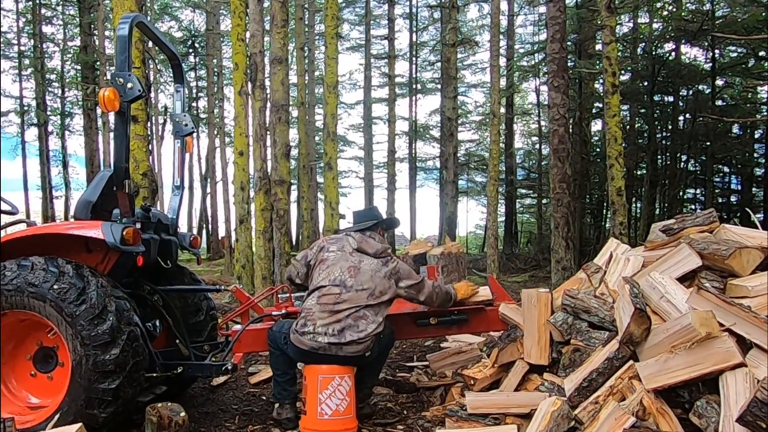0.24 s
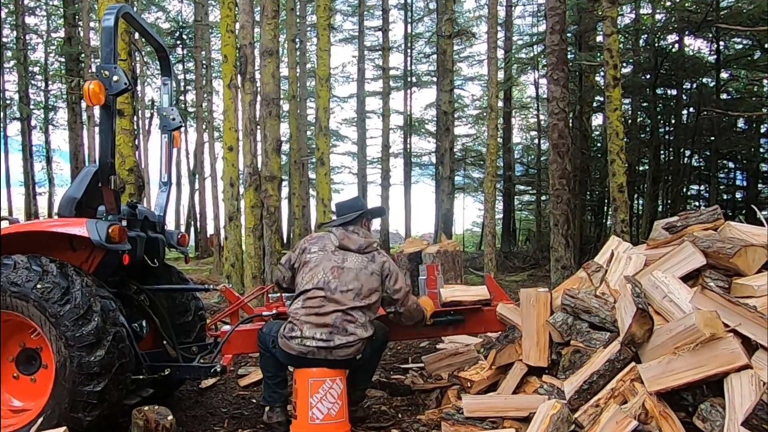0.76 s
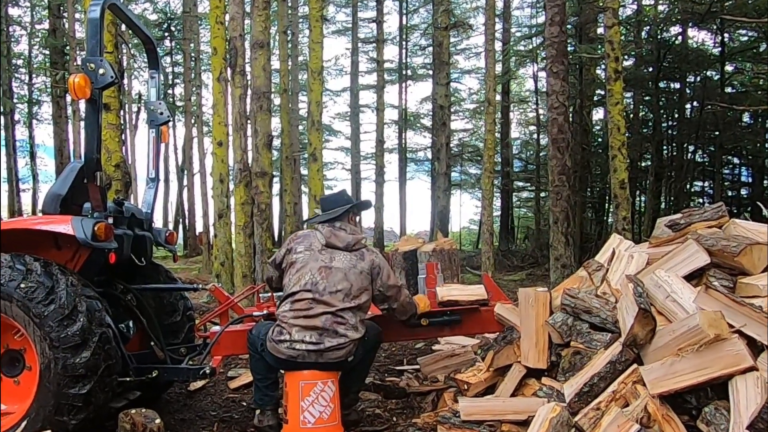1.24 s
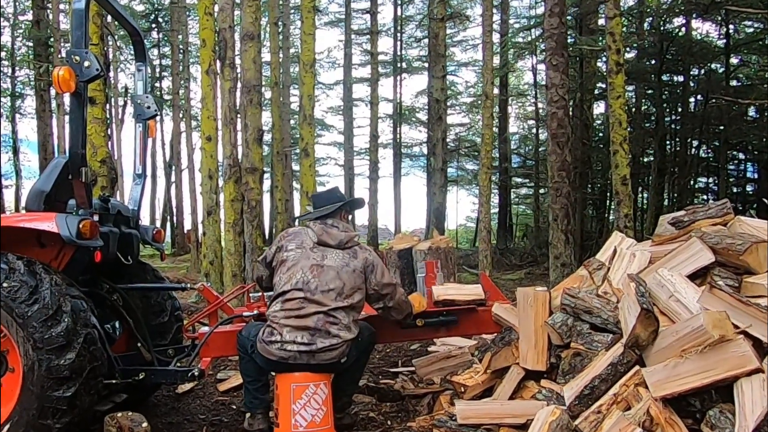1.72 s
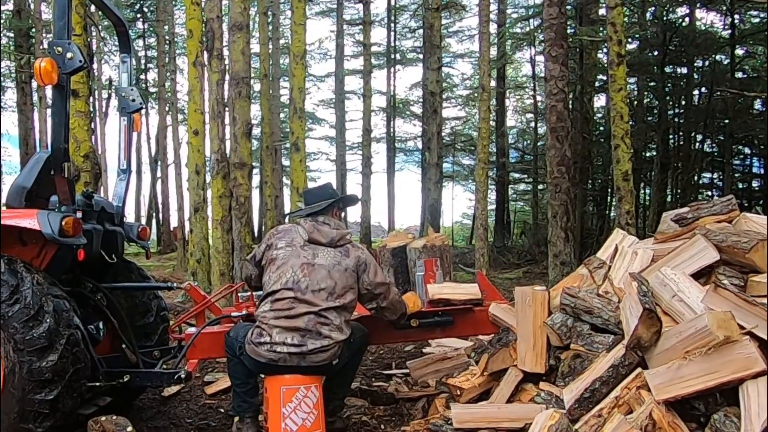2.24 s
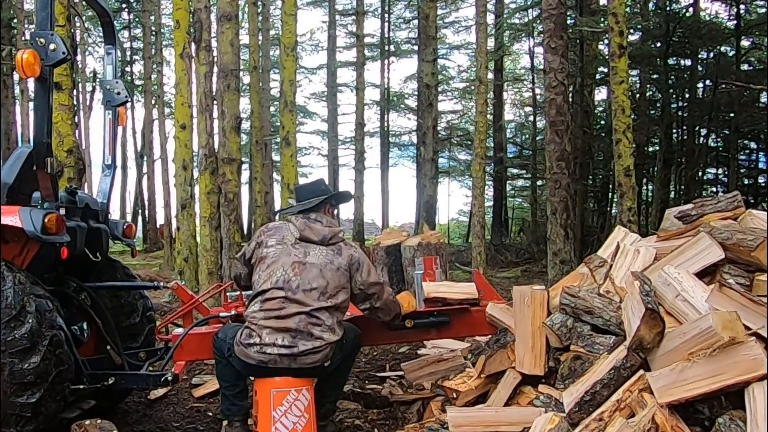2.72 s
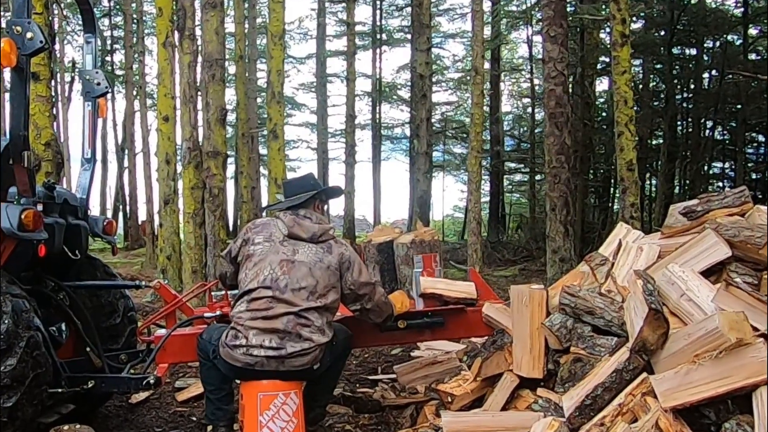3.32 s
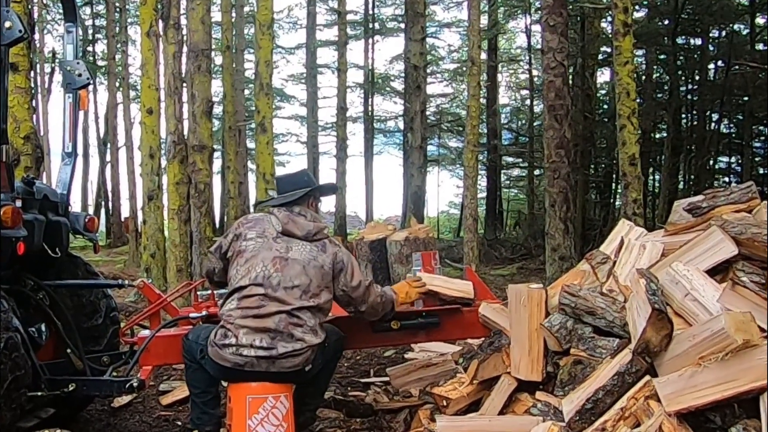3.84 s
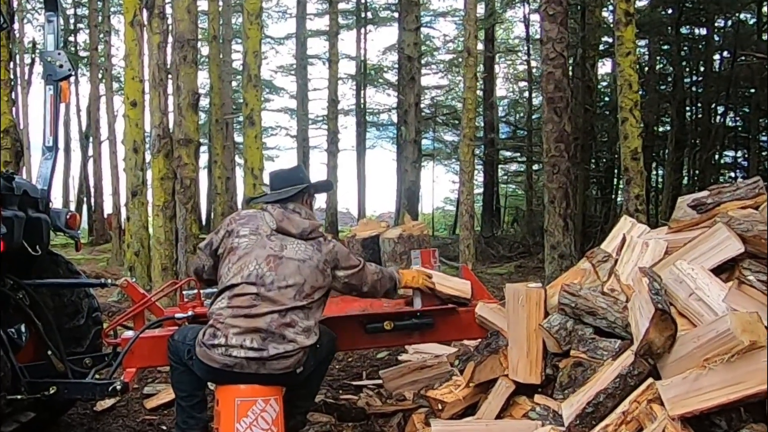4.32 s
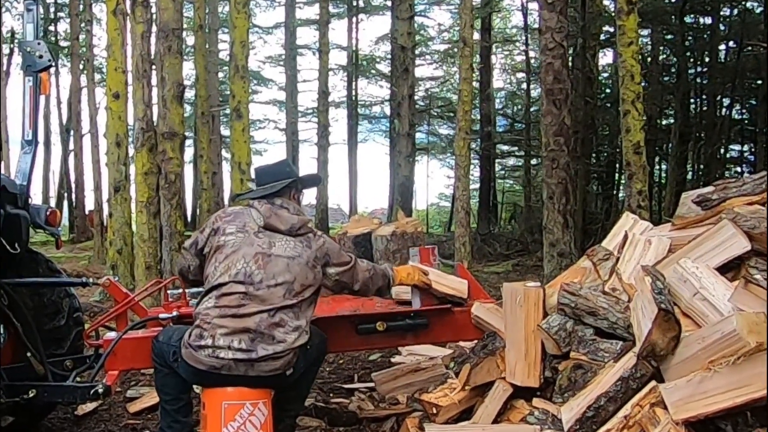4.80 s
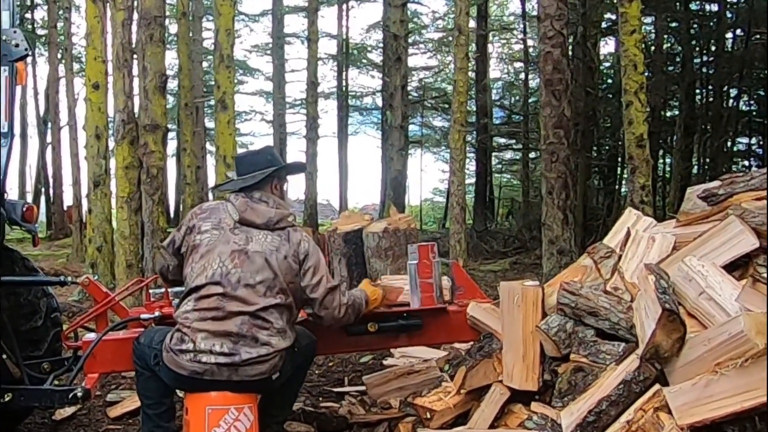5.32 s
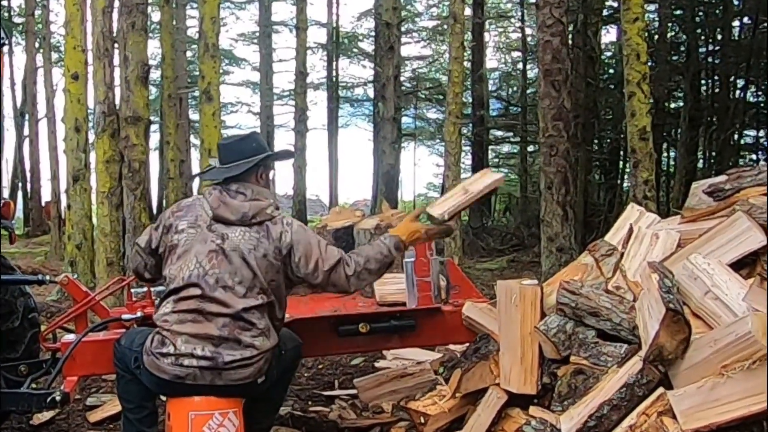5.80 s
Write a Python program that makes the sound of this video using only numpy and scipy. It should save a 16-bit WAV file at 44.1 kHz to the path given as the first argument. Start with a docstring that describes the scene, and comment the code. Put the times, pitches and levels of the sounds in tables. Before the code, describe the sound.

Close stereo pickup of a tractor-driven wood splitter in the open. The diesel's rapid, even clatter and fine whines never stop or change pitch, only loudness. Bright dry cracks of splitting wood, slightly right, cluster in the first three seconds, with faint splinter tearing between them. The engine drops briefly after the biggest split, recovers, and a hollow clack of tossed firewood ends it.

```python
"""A three-cylinder diesel tractor runs throughout at steady revs: its exhaust is a sum of multiples of the
cycle rate, its block clatter a looped cycle of shaped noise, mostly to the left, and its gear and pump whines
are sines. At first it sounds soft and a pump hums, until a log gives way in sharp cracks (bursts of noise
through resonances). The engine sound then drops in level, climbs back, dips again after a later big split and
climbs to full. Splinters tear here and there, and near the end a thrown billet clacks onto the pile."""
import sys
import numpy as np
from scipy import signal
from scipy.fft import rfft, irfft
from scipy.io import wavfile
from scipy.ndimage import uniform_filter1d, map_coordinates

SR = 44100
rng = np.random.default_rng(int(sys.argv[2]) if len(sys.argv) > 2 else 0)


def pcm_store(signal):
    """Save signal as 16-bit PCM."""
    levels = np.round(np.clip(np.atleast_2d(signal), -1, 1) * 32767)
    wavfile.write(sys.argv[1], SR, levels.astype(np.int16).T)


N = 267025

# Level of the tractor's sound as heard. Each row: start of a dip in seconds, gain it falls to (1 = full).
LEVEL_DIPS = [(0.334, 0.16), (2.65, 0.49)]
OPENING_GAIN = 0.31   # before the first dip
DIP_FALL_S = 0.015
REGAIN_FIRST_S, REGAIN_BEND = 0.29, 0.6   # gain won back in the first second; power of time it follows
CLATTER_FOLLOWS = 1.01   # dB of clatter and whine per dB of exhaust

CYCLE_HZ = 15.1257   # one cycle is two turns of the crank and three firings
FIRST_FIRING_S = -.0013

# Steady whines of gears and pump. Each row: frequency in Hz, mean level in dB at full tractor gain.
WHINE_TONES = [(363, -47), (499, -48), (635.2, -40), (650.4, -43), (726.7, -44.5), (832, -53),
               (1136, -46.5), (1633, -40), (2073, -48), (2223, -60.5), (2783, -37), (2826, -49.5),
               (2918, -50), (3042, -47), (3284, -52), (3585, -51.5)]

# Knocks of injectors, combustion, pistons and valves in one engine cycle.
# Each row: place in firings (0-3), pitch in Hz, spread in octaves, relative level at its peak in dB.
ENGINE_KNOCKS = [(.03, 450, .3, 4), (.21, 3400, .2, 5), (.31, 2150, .22, 7), (.38, 350, .3, 4),
                 (.42, 1300, .25, 5), (.48, 650, .25, 6), (.6, 190, .3, 3), (.62, 1600, .5, 5),
                 (.68, 700, .2, 5), (.97, 400, .3, 4), (.98, 1400, .3, 2), (1.06, 680, .25, 4),
                 (1.17, 3500, .35, 8), (1.33, 480, .25, 5), (1.35, 1200, .3, 2), (1.6, 190, .3, 3),
                 (1.63, 3200, .8, -2), (1.78, 1100, .2, 0), (2.03, 720, .2, 4), (2.15, 1500, .3, 13),
                 (2.19, 3900, .4, 0), (2.33, 620, .2, 2), (2.35, 1500, .28, 12.5), (2.37, 3400, .25, 3),
                 (2.55, 700, .22, 9), (2.6, 190, .3, 3), (2.64, 1600, .45, 5.5), (2.93, 620, .35, 6)]
KNOCK_S = .0013   # time constant of a knock at 1500 Hz and above; lower ones last longer
SMALL_CONTACTS_DB = -2   # the bed of small contacts between the knocks, on the scale of the knocks
# Spectrum of the clatter. Each row: frequency in Hz, relative level in dB per Hz.
CLATTER_SPECTRUM = [(25, -19), (60, -20), (110, -0.5), (170, 12.5), (205, 2), (240, 1), (310, -1),
                    (480, -4), (570, -6), (950, -6.5), (2300, -6.5), (3100, -8), (3550, -8.5), (4000, -14),
                    (7000, -19), (10300, -34.5), (11500, -43.5), (15500, -52)]
CLATTER_DB = -26.5
# Resonances of block and panels. Each row: frequency in Hz, width in Hz, lift in dB.
PANEL_RESONANCES = [(498, 40, 5), (670, 110, 5), (778, 71, 5), (1134, 64, 7.5), (1417, 140, 9.5),
                    (1664, 190, 6), (2290, 210, 2.5), (3305, 89, 4), (3470, 170, 3)]
# Share of the clatter's power that repeats every cycle. Each row: frequency in Hz, share (0-1).
REPEATING_SHARE = [(200, .03), (350, .42), (650, .78), (1000, .66), (1500, .88), (2200, .48), (3300, .5), (6000, .22)]
LOOSE_BANDS_HZ = np.array([190, 380, 680, 1450, 2150, 3450, 6000])
# Direction of clatter and whines. Each row: frequency in Hz, left over right in dB.
PAN_BY_PITCH = [(60, 22), (89, -5.5), (130, 0.5), (200, -2), (290, 1.5), (440, -1), (650, 4.5), (970, 4.5),
                (1440, 8.5), (2140, 7.5), (3190, 5.5), (4740, 0), (7060, -2), (10500, 1)]
# Likeness of left and right clatter. Each row: frequency in Hz, likeness (1 = the same in both).
LEFT_RIGHT_LIKENESS = [(200, .999), (440, 0.96), (650, 0.71), (1400, 0.28), (2200, 0.77), (3200, 0.83),
                       (4700, 0.92), (7000, 1), (12000, 0.12)]
LEFT_LEAD_S = 4e-5   # reached at 6 kHz; there is none below 3 kHz

# Exhaust note. Each row: multiple of the cycle rate, relative level in dB.
EXHAUST_HARMONICS = [(2, -25.5), (3, 4.5), (4, -20), (5, -20), (6, 1.5), (7, -15.5), (8, -16), (9, 1),
                     (10, -8.5), (11, -27), (12, -14), (13, -20.5), (14, -21), (15, -16.5), (16, -30),
                     (17, -28), (18, -25), (20, -29)]
EXHAUST_DB, EXHAUST_PAN_DB = -13, -.3
UNEVEN_PLACE = 2.44   # where in the cycle the cylinders' inequality shows, in firings

# Dry cracks of fibres parting. Each row: start in seconds, level in dB before the common trim,
# snap pitch in Hz, length in seconds, bright hiss in dB relative to the snap.
DRY_CRACKS = [(0.208, -33, 3840, .003, -18), (0.246, -35, 3600, .0012, -5), (.2585, -23, 3380, .0015, -13),
              (0.293, -19.5, 3150, .0014, -11), (.3057, -21, 3200, 0.00075, -5),
              (0.483, -32.5, 3470, .0017, -4), (0.5035, -32, 3220, .003, -5),
              (1.3993, -37, 4300, 0.0018, 6), (1.636, -25.5, 3760, .0014, -17),
              (1.7095, -12, 3630, 0.0017, -18), (2.062, -12.5, 3460, 0.003, -24),
              (2.072, -34, 4230, .002, 1), (2.5802, -8.5, 3000, 0.0012, -15), (2.618, -29, 4400, .002, -12),
              (2.626, -35, 4000, .0015, 0), (2.653, -31, 3600, 0.0017, -1)]
# Clacks of pieces that break loose or land, and ring. Each row: start in seconds, level in dB before the
# common trim, snap pitch in Hz, length in seconds, pitch of the piece in Hz, then its ring and its bright
# hiss, both in dB relative to the snap.
RINGING_CLACKS = [(0.31, -19, 3050, 0.0013, 1200, -7, -11.5), (.312, -28, 3470, 0.0041, 620, 5.5, -17),
                  (0.33, -16.5, 2980, 0.0014, 1240, -2, -31), (.6728, -20.5, 3400, 0.0023, 1120, 2, -6),
                  (2.6455, -12, 3430, .0017, 1004, 0, -12.5), (5.985, -18, 3060, 0.0043, 1060, -1, -12),
                  (5.994, -28, 4400, .003, 1380, -2, -7), (5.997, -28, 4400, 0.0056, 1390, 8, -1)]
# Spells in which small splinters tear or scrape. Each row: start and end in seconds, mean level in dB
# before the common trim.
SPLINTER_SPELLS = [(.179, 0.313, -48), (0.412, 0.515, -48), (1.325, 1.426, -49), (2.08, 2.139, -46),
                   (2.41, 2.547, -46), (2.614, 2.638, -35), (4.452, 4.543, -38.5)]
SPLINTERS_PER_S = 45
SPLINTER_HZ, SPLINTER_S, SPLINTER_SPREAD_DB, SPLINTER_HISS_DB = 4360, 0.001, 5.5, 8   # middle pitch, +/- spread
# Ring of a piece of log. Each row: multiple of its pitch, width in Hz, relative level in dB.
LOG_MODES = [(1, 90, 4), (1.45, 261, -7), (1.97, 280, 7)]
SNAP_SHARPNESS = 3.6   # pitch over width of a snapping fibre's ring
SNAP_OVERTONE, SNAP_OVERTONE_DB = 1.28, -13   # its second ring: multiple of the pitch, level
BOUNCE_DB, BOUNCE_S = -11, .005   # ground and splitter frame throw a crack back at once

CUTOFF_HZ = 15800


def from_db(db):
    """Amplitude gain is ten to the power of decibels over twenty."""
    return 10 ** (np.asarray(db) / 20)


def rms_one(x):
    """Normalization: the root of the mean square becomes one."""
    return x / np.sqrt(np.mean(x ** 2) + 1e-20)


def at_hz(points, hz):
    """Interpolation along a logarithmic frequency axis."""
    f, value = np.transpose(points)
    return np.interp(np.log(np.maximum(hz, 1)), np.log(f), value)


def drift(rate):
    """Low-passed noise: a smooth random walk about zero, of rms 1, that changes about rate times a second."""
    f = np.fft.rfftfreq(N, 1 / SR)
    white = rfft(rng.standard_normal(N))
    return rms_one(irfft(white / (1 + (f / rate) ** 2) ** 2, N))


def resonate(x, hz, width_hz):
    """Simple resonance: a pole pair whose radius sets the width, with gain 1 on top."""
    r = np.exp(-np.pi * width_hz / SR)
    zeros = np.array([1, 0, -1]) * (1 - r * r) / 2
    poles = [1, -2 * r * np.cos(2 * np.pi * hz / SR), r * r]
    return signal.lfilter(zeros, poles, x)


def cut(x, hz, kind, order=2):
    """Butterworth filtering: a maximally flat pass band."""
    return signal.sosfilt(signal.butter(order, np.minimum(hz, SR / 2 - 1), kind, fs=SR, output="sos"), x)


def sides(pan_db):
    """Level difference between the ears: left and right gains whose mean is 1; positive is left."""
    gains = from_db(np.array([[.5], [-.5]]) * pan_db)
    return gains / gains.mean(axis=0)


def swell():
    """Gain envelope of the tractor: a quick fall at each dip, then a power-law climb that slows until full."""
    t = np.arange(N) / SR
    gain = np.full(N, OPENING_GAIN)
    for s, low in LEVEL_DIPS:
        regained = REGAIN_FIRST_S * np.abs(t - s) ** REGAIN_BEND
        gain = np.where(t < s, gain, low + regained)
    return uniform_filter1d(np.minimum(gain, 1), max(1, round(DIP_FALL_S * SR)))


def crank(wander_s=5e-5, shake_s=2e-5):
    """Rotation as phase, in engine cycles run so far: the governor lets the crank stray only slightly."""
    t = np.arange(N) / SR - FIRST_FIRING_S
    return CYCLE_HZ * (t + wander_s * drift(3.0) + shake_s * drift(19))


def pump_hum(level_db=-50, hum_hz=356, waver_db=2.5):
    """A pure tone under load: the hydraulic pump hums faintly until the log first gives way."""
    t = np.arange(N) / SR
    loaded = uniform_filter1d(1. * (t < LEVEL_DIPS[0][0]), max(1, round(DIP_FALL_S * SR)))
    level = np.sqrt(2) * from_db(level_db + waver_db * drift(12))
    return loaded * level * np.sin(2 * np.pi * hum_hz * t)


def whines(cycles, waver_db=1.5, stray=0.37):
    """Meshing tones: gear teeth and pump strokes follow whole multiples of the cycle, with a small phase stray (rad)."""
    out = 0
    for hz, db in WHINE_TONES:
        multiple = round(hz / CYCLE_HZ)
        angle = 2 * np.pi * multiple * cycles + rng.uniform(0, 2 * np.pi) + stray * drift(6.6)
        level = np.sqrt(2) * from_db(db + waver_db * drift(33))
        out = out + level * np.sin(angle) * sides(at_hz(PAN_BY_PITCH, hz))
    return out


def bell(hz, pitch_hz, octaves):
    """Gaussian spectrum: the share of a knock's sound that falls at a frequency."""
    return np.exp(-(np.log2(np.maximum(hz, 1) / pitch_hz) / octaves) ** 2 / 2)


def knocking(turn, hz):
    """Addition of powers: strength near one pitch round the cycle (turn 0-1), knocks on a bed of small contacts."""
    power = from_db(SMALL_CONTACTS_DB) ** 2
    for place, pitch_hz, octaves, db in ENGINE_KNOCKS:
        away_s = ((turn - place / 3 + .5) % 1 - .5) / CYCLE_HZ
        length_s = KNOCK_S * np.sqrt(1500 / min(pitch_hz, 1500))
        pulse = np.exp(-(away_s / length_s) ** 2)
        power = power + from_db(db) ** 2 * bell(hz, pitch_hz, octaves) * pulse
    return rms_one(np.sqrt(power))


def looped_knocks(cycles):
    """Periodicity: one cycle of noise, shaped by band into knocks, evened in colour and repeated with the crank."""
    size = 2 * round(SR / CYCLE_HZ / 2)
    f = np.arange(size // 2 + 1) * CYCLE_HZ
    centres = np.geomspace(200, 12800, 13)
    shares = np.array([at_hz(np.c_[centres, one], f) for one in np.eye(len(centres))])
    weights = np.sqrt(shares * shares.sum(axis=1, keepdims=True))   # wider bands carry more power
    strength = np.array([knocking(np.arange(size) / size, hz) for hz in centres])
    spectrum = np.exp(2j * np.pi * rng.random(len(f)))
    for _ in range(6):   # alternate between the wanted envelopes and an even spectrum
        bands = np.fft.ifft(spectrum * shares, size)
        band_power = uniform_filter1d(np.abs(bands) ** 2, size=45, mode="wrap")
        bands = bands * strength / np.sqrt(band_power + 1e-20)
        spectrum = (np.fft.fft(bands)[:, :len(f)] * weights).sum(axis=0)
        spectrum = spectrum / np.sqrt(uniform_filter1d(np.abs(spectrum) ** 2, size=5))
    spectrum[[round(hz / CYCLE_HZ) for hz, _ in WHINE_TONES]] = 0   # these multiples belong to the gears
    one_cycle = rms_one(irfft(spectrum))
    return map_coordinates(one_cycle, [cycles % 1 * size], order=3, mode="grid-wrap")


def loose_rattle(cycles, hz, follows=0.36):
    """Amplitude modulation: each knock shakes up the loose rattle near one pitch, by a power of its strength."""
    turn = np.linspace(0, 1, 600)
    return rms_one(np.interp(cycles % 1, turn, knocking(turn, hz)) ** follows)


def clatter(cycles, uneven_db=.8):
    """Forced vibration: repeating knocks and loose rattle sound through the resonances of block and panels."""
    f = np.fft.rfftfreq(N, 1 / SR)
    repeating = np.clip(at_hz(REPEATING_SHARE, f), 0, 1)
    locked = rfft([looped_knocks(cycles), looped_knocks(cycles)] * from_db(uneven_db * drift(50)))
    white = rng.standard_normal((2, N))
    loose = 0
    for hz, share in zip(LOOSE_BANDS_HZ, np.eye(len(LOOSE_BANDS_HZ))):
        band = at_hz(np.c_[LOOSE_BANDS_HZ, share], f)
        loose = loose + rfft(white * loose_rattle(cycles, hz)) * band
    mid, side = np.sqrt(repeating) * locked + np.sqrt(1 - repeating) * loose
    alike = np.clip(at_hz(LEFT_RIGHT_LIKENESS, f), 0, 1)
    pair = np.sqrt(1 + alike) * mid + np.sqrt(1 - alike) * side * [[1], [-1]]
    lead_s = LEFT_LEAD_S * np.clip(f / 3000 - 1, 0, 1)
    lead = np.exp(1j * np.pi * f * lead_s * [[1], [-1]])   # the treble reaches the left first
    lift_db = sum(db / (1 + (2 * (f - hz) / width) ** 2) for hz, width, db in PANEL_RESONANCES)
    colour = from_db(at_hz(CLATTER_SPECTRUM, f) + lift_db)
    out = irfft(pair * lead * colour * sides(at_hz(PAN_BY_PITCH, f)), N)
    return from_db(CLATTER_DB) * out / out.mean(axis=0).std()


def exhaust(cycles, uneven=0.014, jitter_s=1e-4, silencer_hz=145, silencer_width_hz=12):
    """Fourier series: every third multiple is the firing note; unequal cylinders fill in those between."""
    angle = 2 * np.pi * (cycles + CYCLE_HZ * jitter_s * drift(33))
    note = 0
    for k, db in EXHAUST_HARMONICS:
        hz = k * CYCLE_HZ
        # above its resonance the silencer answers late
        lag = np.arctan2(hz * silencer_width_hz, silencer_hz ** 2 - hz ** 2)
        start = 2 * np.pi * UNEVEN_PLACE / 3 if k % 3 else 0
        note = note + from_db(db) * np.sin(k * (angle - start) - lag)
    return from_db(EXHAUST_DB) * rms_one(note) * (1 + uneven * drift(30))


def crack(snap_hz, length_s, hiss_db, piece_hz=900, ring_db=-18, scatter_db=-25, scatter_s=0.05, apart=0.14,
          hiss_low_hz=3700, hiss_top_hz=7000, air_db=-22, tearing_db=4.0):
    """Impulse excitation: a break and dying tearing ring the wood (a whole log hardly); the woodpile scatters a tail."""
    t = np.arange(SR // 10) / SR
    bounce = from_db(BOUNCE_DB) * np.exp(-t / BOUNCE_S) * (t > length_s)
    tearing = rng.standard_normal(len(t)) * (np.exp(-t / length_s) + bounce)
    first_break = rms_one(1. * (t == 0))
    fibres = from_db(tearing_db) * rms_one(tearing) + first_break
    fibres = rms_one(fibres) * np.sqrt(length_s / t[-1])
    # noise that differs between left and right: in the break itself, and in the scattered tail
    spread = apart * (t < length_s) + from_db(scatter_db) * np.exp(-t / scatter_s)
    burst = fibres + spread * rng.standard_normal((2, len(t)))
    edges = snap_hz * (1 + np.array([-.5, .5]) / SNAP_SHARPNESS)
    overtone = rms_one(cut(burst, edges * SNAP_OVERTONE, "band"))
    snap = rms_one(cut(burst, edges, "band")) + from_db(SNAP_OVERTONE_DB) * overtone
    modes = sum(from_db(db) * rms_one(resonate(burst, k * piece_hz, width)) for k, width, db in LOG_MODES)
    ring = cut(modes, 4400, "low")
    bright = cut(burst, hiss_low_hz, "high")
    air = cut(bright, [9000, 13000], "band")
    hiss = cut(bright, hiss_top_hz, "low", order=4) + from_db(air_db) * air
    parts = rms_one(snap) + from_db(ring_db) * rms_one(ring) + from_db(hiss_db) * rms_one(hiss)
    return parts * np.sqrt(length_s / t[-1])


def splinters():
    """Random point process: tiny cracks, loosely spaced through each spell, as (s, dB, pitch Hz)."""
    for start, end, db in SPLINTER_SPELLS:
        count = max(1, round((end - start) * SPLINTERS_PER_S))
        for k, (when, size, pitch) in enumerate(rng.random((count, 3))):
            s = start + (end - start) * (k + when) / count
            level_db = db + SPLINTER_SPREAD_DB * (2 * size - 1)
            yield s, level_db, SPLINTER_HZ * 2 ** ((pitch - .5) / 2)


def splitting(level_db=-5.0, pan_db=-4.0):
    """Superposition: cracks, clacks and splinters from splitter and pile add up, a little to the right."""
    breaks = [(s, db, crack(hz, length_s, hiss_db)) for s, db, hz, length_s, hiss_db in DRY_CRACKS]
    for s, db, hz, length_s, piece_hz, ring_db, hiss_db in RINGING_CLACKS:
        breaks.append((s, db, crack(hz, length_s, hiss_db, piece_hz, ring_db)))
    breaks += [(s, db, crack(hz, SPLINTER_S, SPLINTER_HISS_DB)) for s, db, hz in splinters()]
    out = np.zeros((2, N))
    for s, db, sound in breaks:
        at = round(s * SR)
        out[:, at:at + sound.shape[1]] += from_db(db + level_db) * sound[:, :N - at]
    return out * sides(pan_db)


def scene():
    """Common drive: one crank times exhaust, clatter and whines; the pump hums and the wood cracks over them."""
    gain, cycles = swell(), crank()
    block = gain ** CLATTER_FOLLOWS * (clatter(cycles) + whines(cycles))
    tractor = gain * exhaust(cycles) * sides(EXHAUST_PAN_DB) + block
    return tractor + pump_hum() + splitting()


def record(dry):
    """Elliptic filtering: the top is cut steeply."""
    return signal.sosfilt(signal.ellip(10, .1, 80, CUTOFF_HZ, fs=SR, output="sos"), dry)


dry = scene()
out = record(dry)
pcm_store(out)
```